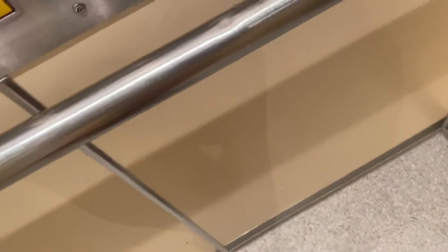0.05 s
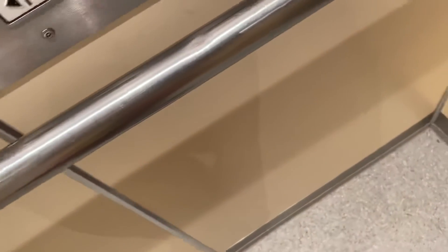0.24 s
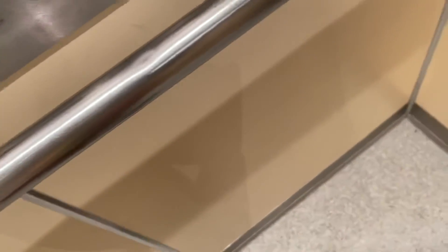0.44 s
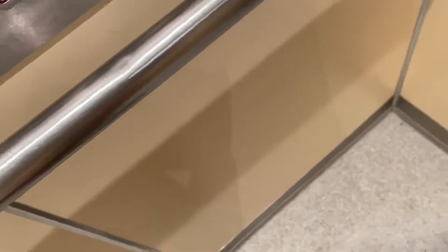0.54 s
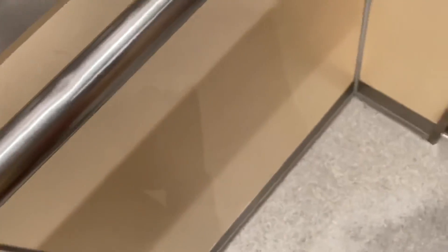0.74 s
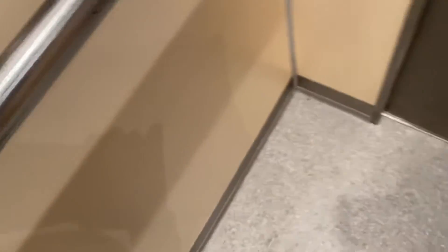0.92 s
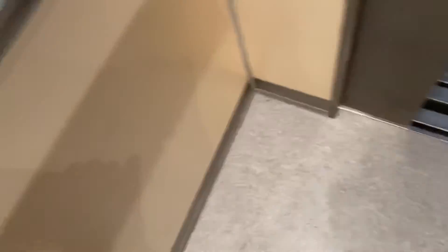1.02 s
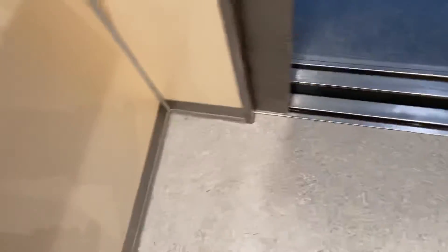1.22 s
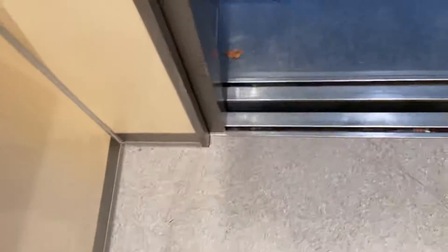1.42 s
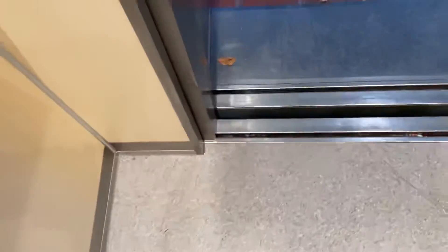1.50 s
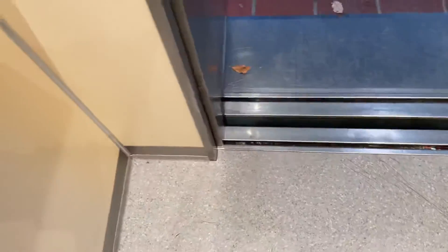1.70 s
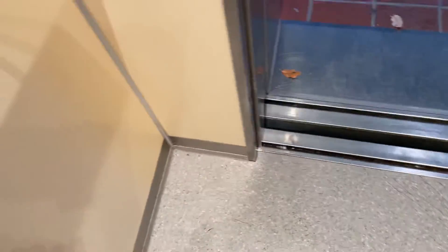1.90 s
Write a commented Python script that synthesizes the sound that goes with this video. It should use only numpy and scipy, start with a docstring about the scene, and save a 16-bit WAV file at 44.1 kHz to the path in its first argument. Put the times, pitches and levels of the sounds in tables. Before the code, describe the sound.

An elevator door slides open, heard close inside the small metal cab: a knock at the start, a swelling low rumble and rolling rush with faint squeaks, a braking shudder, then a small metal click.

```python
"""A lift's sliding door runs open, heard from inside the small metal cab by a close pair of microphones. Drive
and rollers speed up and slow down: a wavering tone booms in the cab's strongest resonance, noise patches
coloured by panel resonances rumble and rush, and narrow noise squeaks shortly. Band-limited noise bursts make
the door knock as it starts and shudder as it brakes. Near the end a small metal part clicks: two touches of
noise ring its modes."""
import sys
import numpy as np
from scipy import signal
from scipy.fft import rfft, irfft
from scipy.io import wavfile
from scipy.ndimage import uniform_filter1d

SR = 44100
rng = np.random.default_rng(int(sys.argv[2]) if len(sys.argv) > 2 else 0)


def makeup_ratio(level_db):
    """Linear amplitude ratio for a level in decibels (20 dB per factor of ten)."""
    decades = np.asarray(level_db, float) / 20
    return 10 ** decades


def log_audio(samples):
    """Write samples as a 16-bit WAV file to the path given in sys.argv[1]."""
    # one column per channel
    frames = np.atleast_2d(samples).T
    # limit to full scale, then quantise
    limited = np.clip(frames, -1, 1)
    pcm = np.round(limited * 32767).astype(np.int16)
    wavfile.write(sys.argv[1], SR, pcm)


N = 85995


def rms_one(x):
    """Scale to rms 1."""
    return x / np.sqrt(np.mean(x ** 2) + 1e-20)


def in_time(rows):
    """Table columns as curves over time, one value per sample."""
    time_s, *columns = np.transpose(rows)
    return [np.interp(np.arange(N) / SR, time_s, column) for column in columns]


def drift(corner_hz):
    """Slow random curve of rms 1: noise through two equal low-pass poles."""
    hop, settle = 40, 2000  # samples per drift point, points discarded
    r = np.exp(-2 * np.pi * corner_hz * hop / SR)
    noise = rng.standard_normal(N // hop + settle + 2)
    slow = signal.lfilter([1], [1, -2 * r, r * r], noise)[settle:]
    return np.interp(np.arange(N) / hop, np.arange(len(slow)), rms_one(slow))


def resonance(x, hz, width_hz):
    """One two-pole resonance, gain 1 on top."""
    r = np.exp(-np.pi * width_hz / SR)
    zeros = np.array([1, 0, -1]) * (1 - r * r) / 2
    poles = [1, -2 * r * np.cos(2 * np.pi * hz / SR), r * r]
    return signal.lfilter(zeros, poles, x)


def band(x, low_hz, high_hz):
    """Steep band-pass."""
    edges_hz = [low_hz, min(high_hz, .45 * SR)]
    return signal.sosfilt(signal.butter(4, edges_hz, "band", fs=SR, output="sos"), x)


def dying(start_s, rise_s, t60_s):
    """Envelope that rises from start_s and dies by 60 dB per t60_s."""
    t = np.maximum(np.arange(N) / SR - start_s, 0)
    return (1 - np.exp(-t / rise_s)) * makeup_ratio(-60 * t / t60_s)


# cab's strongest resonance, before waver: (time [s], pitch [Hz], level [dB])
BOOM_CURVE = [(0.0, 109.5, -50), (0.124, 108.5, -38.5), (0.26, 114.5, -44.5), (0.276, 111.1, -32),
              (0.456, 114.5, -23.5), (0.526, 114, -46), (0.542, 115.1, -23.5), (0.64, 112.2, -22.5),
              (0.7, 108.8, -27), (0.726, 114.2, -45), (0.748, 113.5, -34), (0.96, 111.2, -14.5),
              (1.048, 114.4, -21.5), (1.128, 111.6, -18.5), (1.156, 114, -49), (1.178, 113.3, -25),
              (1.264, 117.9, -28), (1.324, 118, -21.5), (1.498, 117.4, -31.5), (1.618, 111, -44),
              (1.916, 122.5, -44.5), (1.95, 123.6, -69)]
PITCH_WAVER_HZ, LEVEL_WAVER_DB = 1.2, 1.0  # rms
BOOM_SIDE_DB = -20  # differing part re shared


def boom():
    """Sine at the cab's strongest resonance, wavering in pitch and level."""
    hz, db = in_time(BOOM_CURVE)
    phase = 2 * np.pi * np.cumsum(hz + PITCH_WAVER_HZ * drift(4.64)) / SR
    tone = np.sqrt(2) * makeup_ratio(db + LEVEL_WAVER_DB * drift(20.0)) * np.sin(phase)
    return tone * makeup_ratio([[0], [BOOM_SIDE_DB]])


# door travel, before register weights:
# (time [s], rolling level [dB], upper middle re rolling [dB], treble re rolling [dB])
TRAVEL_CURVE = [(0.0, -56.5, -3, -11.5), (.08, -52, -5.5, -10), (.152, -48.5, -3, -13.5),
                (.238, -42.5, -4, -17), (.324, -45, -8.5, -12.5), (.418, -39, -7, -17.5),
                (.5, -40.5, -6, -16.5), (.6, -37, -7.5, -17.5), (.68, -37.5, -9, -17),
                (.77, -34.5, -10, -16.5), (.87, -36, -11.5, -18.5), (.976, -35, -11, -19.5),
                (1.07, -34.5, -11, -19.5), (1.166, -36.5, -8.5, -15.5), (1.276, -35, -11.5, -22),
                (1.4, -43.5, -9.5, -17), (1.53, -49, -7, -13.5), (1.66, -51, -10.5, -16.5),
                (1.8, -53.5, -10, -14.5), (1.95, -61.5, -5, -16)]
# drive through the cab frame, before register weights:
# (time [s], deepest rumble [dB], rumble [dB], upper boom [dB])
RUMBLE_CURVE = [(0.0, -54, -46, -50), (0.184, -32, -53, -35), (0.282, -28.5, -59, -35.5),
                (0.358, -28, -43, -39), (0.46, -33, -27, -36), (0.482, -38.5, -37, -33.5),
                (0.884, -32.5, -31.5, -33), (0.938, -42, -35, -28.5), (0.96, -24, -41, -28),
                (1.032, -33, -18.5, -26.5), (1.07, -42, -32, -29.5), (1.318, -31, -44, -30),
                (1.406, -25.5, -41, -38.5), (1.466, -27, -52, -34.5), (1.596, -43.5, -36, -39),
                (1.64, -37, -36.5, -43), (1.7, -33, -35, -40), (1.95, -49.5, -53, -48)]
# rumble weights: deepest, rumble, upper boom [dB]
RUMBLE_WEIGHTS_DB = [-8, -3.5, -8]
# rolling weights: around the boom, low middle, upper middle, treble [dB]
ROLL_WEIGHTS_DB = [1, 1.5, 9, 19]
# borders between the seven registers [Hz]
REGISTER_EDGES_HZ = [55, 95, 140, 215, 700, 2200]
# relative colour of what both microphones share: (frequency [Hz], density [dB per Hz])
SHARED_COLOUR = [(15, -51), (25, -16), (35, -10), (49, -8.5), (76, -7), (97, -9.5), (113, -11), (142, -7.5),
                 (180, -13.5), (259, -20), (327, -20.5), (447, -26.5), (643, -28.5), (713, -32),
                 (1200, -37), (1770, -45), (2420, -46.5), (3660, -51.5), (5850, -54.5), (9580, -60),
                 (12400, -70), (13200, -68.5), (16000, -77.5)]
# relative colour of what differs between them: (frequency [Hz], density [dB per Hz])
DIFFERING_COLOUR = [(15, -63), (25, -17), (48, -25.5), (116, -4.5), (158, -15), (311, -13.5), (447, -17),
                    (579, -18.5), (855, -25), (1480, -29.5), (2070, -41.5), (3300, -40.5), (4750, -52.5),
                    (5850, -45.5), (9580, -50.5), (12400, -58.5), (16000, -62)]
DIFFERING_DB = -10  # added to the differing colour
# cab and door panel resonances: (frequency [Hz], width [Hz], gain [dB])
PANEL_MODES = [(36.7, 9.7, 8.5), (167.6, 8.2, 12), (197, 8.7, 11), (325.9, 8.2, 5), (351, 36, 2.5),
               (493, 20, 3), (541, 20, 2), (648.6, 9.7, 6.5), (695, 5, -0.5), (930, 11, 5.5),
               (984, 11, 2.5), (1085, 32, 3.5), (1223, 6.2, 10), (1930, 17, 6), (2380, 6.7, 2.5),
               (2456, 6.7, 2.5)]


def rolling(together_db=1.32, own_db=1.5):
    """Drive and rollers: noise in half-octave patches, each following its register's level."""
    roll, middle, treble = in_time(TRAVEL_CURVE)
    deepest, deep, upper = in_time(RUMBLE_CURVE)
    levels_db = [
        deepest + RUMBLE_WEIGHTS_DB[0],
        deep + RUMBLE_WEIGHTS_DB[1],
        roll + ROLL_WEIGHTS_DB[0],
        upper + RUMBLE_WEIGHTS_DB[2],
        roll + ROLL_WEIGHTS_DB[1],
        roll + middle + ROLL_WEIGHTS_DB[2],
        roll + treble + ROLL_WEIGHTS_DB[3],
    ]
    f = np.maximum(np.fft.rfftfreq(N, 1 / SR), 1)
    colours = []
    for rows in (SHARED_COLOUR, DIFFERING_COLOUR):
        hz, db = np.transpose(rows)
        colours.append(makeup_ratio(np.interp(np.log(f), np.log(hz), db)))
    colour = np.array(colours)
    for hz, width_hz, db in PANEL_MODES:
        colour = colour * (1 + (makeup_ratio(db) - 1) / (1 + (2 * (f - hz) / width_hz) ** 2))

    spec = rfft(rng.standard_normal((2, N)), axis=1) * colour * makeup_ratio([[0], [DIFFERING_DB]])
    # reference: shared rms 1 over 250-1500 Hz
    reference = irfft(spec[0] * (f > 250) * (f < 1500), N)
    spec = spec / np.sqrt(np.mean(reference ** 2))

    out, together = 0, drift(9.0)
    place = np.clip(2 * np.log2(f / 25), 0, 19)  # half octaves above 25 Hz
    for k in range(20):
        share = np.clip(1 - np.abs(place - k), 0, 1)  # crossfade to neighbours
        level_db = levels_db[np.searchsorted(REGISTER_EDGES_HZ, 25 * 2 ** (k / 2))]
        gain = makeup_ratio(level_db + together_db * together + own_db * drift(17.0))
        out = out + gain * irfft(spec * share, N, axis=1)
    return out


# guides in the track, core before edge shaping:
# (time [s], length [s], pitch [Hz], width [Hz], level [dB], differing re shared [dB])
SQUEAK_EVENTS = [(.07, 0.047, 2320, 350, -59.5, -8), (0.204, .03, 3750, 60, -62, -2),
                 (.235, 0.051, 3810, 30, -59.5, -4), (.24, 0.03, 7560, 60, -56, -5),
                 (0.261, 0.038, 2670, 30, -51.5, -6), (0.304, 0.051, 2800, 197, -56, -5),
                 (0.301, .055, 5750, 300, -57, -4), (0.334, 0.028, 3160, 60, -54.5, -7),
                 (0.244, 0.095, 11250, 150, -69.5, 0), (.49, 0.051, 7900, 303.7, -55, -4),
                 (0.549, 0.025, 2620, 80, -55.5, -17), (0.666, 0.038, 3860, 80.8, -64, 1),
                 (.7, 0.145, 5790, 49.7, -62, 0.5), (0.756, 0.062, 2430, 200, -56, -3),
                 (.78, 0.041, 2485, 120, -49.5, -11), (0.877, 0.093, 6080, 49.84, -63, -0.5),
                 (.89, 0.059, 4000, 150, -60.5, -3.5), (0.999, 0.02, 3580, 60, -60.5, -2.5),
                 (1.069, 0.044, 3320, 50, -55, -4), (1.095, 0.031, 2600, 150, -57, -2),
                 (1.142, 0.019, 3050, 250, -47.5, 0), (1.129, 0.021, 5950, 150, -60, -5),
                 (1.18, 0.096, 3044, 400.8, -58.5, -1)]
SKIRT_DB, SKIRT_WIDTHS = -4, 6.0  # re core level, re core width
SQUEAK_EDGE_S, SQUEAK_RISE_PER_S = 0.02, .25  # attack (release twice as long), fraction of pitch per s


def low_passed(x, width_hz):
    """Complex noise limited to width_hz around zero frequency."""
    return signal.sosfilt(signal.butter(2, width_hz / 2, fs=SR, output="sos"), x)


def squeaks():
    """Stick-slip tones: narrow noise with a fuzzy skirt around a slightly rising pitch."""
    out, t = np.zeros((2, N)), np.arange(N) / SR
    white = rng.standard_normal((2, N))
    grain = white[0] + 1j * white[1]
    for k, (start_s, length_s, hz, width_hz, db, side_db) in enumerate(SQUEAK_EVENTS):
        noise = np.roll(grain, 3001 * k)  # a different stretch each time
        core = low_passed(noise, width_hz)
        skirt = low_passed(noise, width_hz * SKIRT_WIDTHS)
        core = core / np.sqrt(uniform_filter1d(np.abs(core) ** 2, size=1500) + 1e-12)  # even level
        skirt = skirt / np.sqrt(np.mean(np.abs(skirt) ** 2))
        wobble = core + makeup_ratio(SKIRT_DB) * skirt
        from_middle_s = t - start_s - length_s / 2
        carrier = np.exp(2j * np.pi * hz * (t + SQUEAK_RISE_PER_S * from_middle_s ** 2 / 2))
        tone = wobble * carrier
        nearest_edge_s = np.minimum(t - start_s, (start_s + length_s - t) / 2)
        shape = np.clip(nearest_edge_s / SQUEAK_EDGE_S + .5, 0, 1)
        out += np.sqrt(2) * makeup_ratio(db) * shape * np.array([tone.real, makeup_ratio(side_db) * tone.imag])
    return out


# knocks and scuffs of the door, level before the envelope:
# (time [s], level [dB], low edge [Hz], high edge [Hz], rise [s], t60 [s])
KNOCK_EVENTS = [(0.161, -34.5, 660, 1510, 0.0026, 0.19), (0.166, -46.5, 1250, 3220, 0.0041, 0.19),
                (0.065, -47.5, 806, 1400, 0.0067, 0.17), (0.452, -43, 702.7, 1480, 0.0083, 0.12),
                (1.344, -49.5, 3480, 14800, 0.0013, 0.024), (1.347, -42, 495, 2460, 0.0051, 0.17),
                (1.367, -51.5, 2970, 11600, 0.006, 0.18), (1.5, -58, 2500, 12000, .005, 0.073),
                (1.565, -81, 3000, 11000, .005, .12)]


def knocks():
    """Door knocks and scuffs: band-limited noise bursts that rise fast and die in the cab."""
    out, white = np.zeros((2, N)), rng.standard_normal((2, N))
    for start_s, db, low_hz, high_hz, rise_s, t60_s in KNOCK_EVENTS:
        burst = rms_one(band(white, low_hz, high_hz))
        out += makeup_ratio(db) * dying(start_s, rise_s, t60_s) * burst
    return out


# click and its bounce, reference level for the parts: (time [s], level [dB])
CLICK_TOUCHES = [(1.681, -50.5), (1.689, -46.5)]
# metal modes, level before RING_DB: (frequency [Hz], level re touch [dB], t60 [s])
METAL_MODES = [(5430, -7, 0.12), (5720, -6, 0.15), (7140, -23, 0.03), (9351, -8, 0.17), (10340, -7.5, 0.32),
               (11000, -12, 0.14), (11210, -32, 0.35), (11730, -18, 0.21), (12400, -12, 0.2),
               (13140, -7.5, 0.17)]
CRACK_DB, TAIL_DB, RING_DB = 0, -11, -10  # re touch
CRACK_T60_S, TAIL_T60_S, RING_WIDTH_HZ = .03, 0.24, 300


def click():
    """Two touches ring the metal's modes as narrow noise, with a crack and a bright tail."""
    out, white = np.zeros((2, N)), rng.standard_normal((2, N))
    crack = rms_one(band(white, 2100, 18000))
    tail = rms_one(band(white, 4920, 9800))
    for start_s, db in CLICK_TOUCHES:
        out += makeup_ratio(db + CRACK_DB) * dying(start_s, .0005, CRACK_T60_S) * crack
        out += makeup_ratio(db + TAIL_DB) * dying(start_s, 0.0014, TAIL_T60_S) * tail
        for hz, mode_db, t60_s in METAL_MODES:
            ring = rms_one(resonance(white, hz, RING_WIDTH_HZ))
            out += makeup_ratio(db + mode_db + RING_DB) * dying(start_s, 0.0013, t60_s) * ring
    return out


# microphones turn toward the doorway: (time [s], left minus right [dB])
TURN_CURVE = [(0.0, -1.5), (1.292, 0.5), (1.346, 2), (1.662, 0), (1.856, 0), (1.95, -2)]


def scene():
    """Sum the sources; shared plus and minus differing part make left and right, then balance."""
    shared, differing = boom() + rolling() + squeaks() + knocks() + click()
    balance_db, = in_time(TURN_CURVE)
    left = (shared + differing) * makeup_ratio(balance_db / 2)
    right = (shared - differing) * makeup_ratio(-balance_db / 2)
    return np.array([left, right])


# microphone ports: (frequency [Hz], shared gain [dB], differing gain [dB])
PORT_COLOUR = [(6000, 0, 0), (6700, -12, 0), (7600, -20, 0), (8400, -8, 0), (9500, 0, 0), (10300, 0, -20),
               (11500, 0, -28), (12400, -4, -18), (13300, -11, 0), (15700, -9, 0), (16000, -50, -40)]


def ports(dry):
    """Microphone ports colour the shared and the differing treble separately."""
    hz, *gains_db = np.transpose(PORT_COLOUR)
    f = np.fft.rfftfreq(N, 1 / SR)
    gains = makeup_ratio(np.array([np.interp(f, hz, db) for db in gains_db]))
    parts = np.array([dry[0] + dry[1], dry[0] - dry[1]]) / 2
    shared, differing = irfft(rfft(parts, axis=1) * gains, N, axis=1)
    return np.array([shared + differing, shared - differing])


def top_cut(x):
    """Nothing passes above the cut-off."""
    return signal.sosfilt(signal.butter(12, 15780, fs=SR, output="sos"), x)


def record(dry):
    """Pick the scene up through the microphone ports and finish the mix."""
    mix = ports(dry)
    return top_cut(mix)


dry = scene()
out = record(dry)
log_audio(out)
```